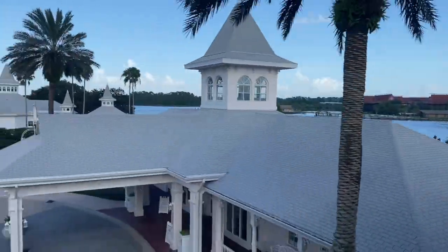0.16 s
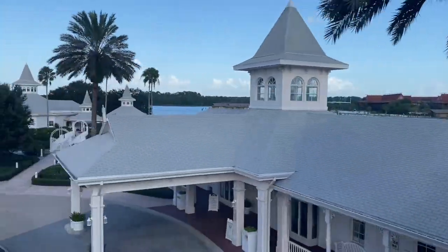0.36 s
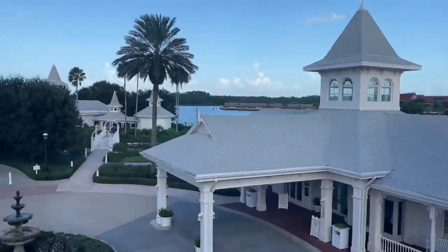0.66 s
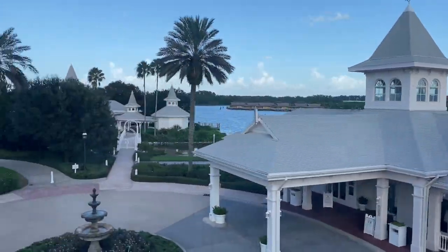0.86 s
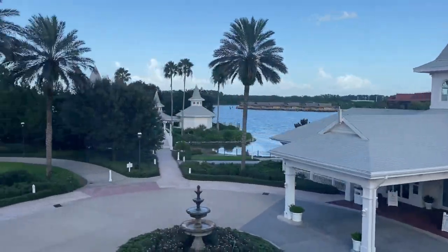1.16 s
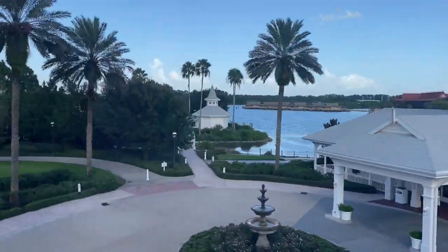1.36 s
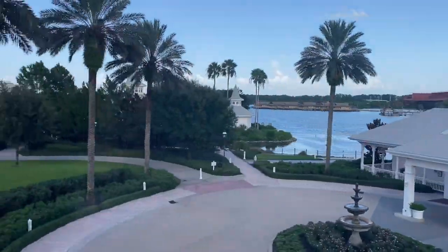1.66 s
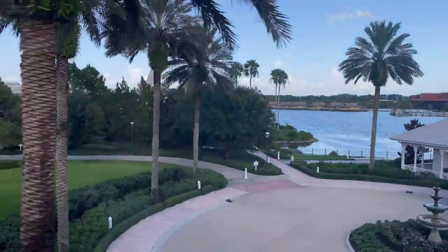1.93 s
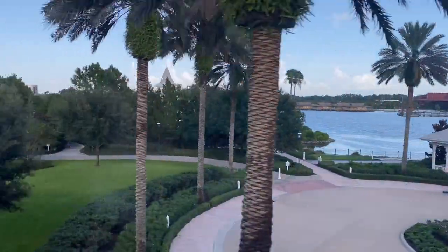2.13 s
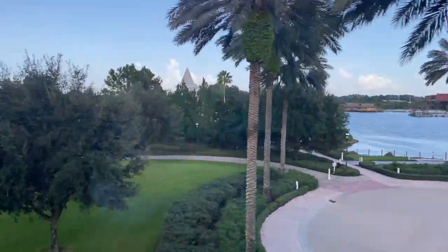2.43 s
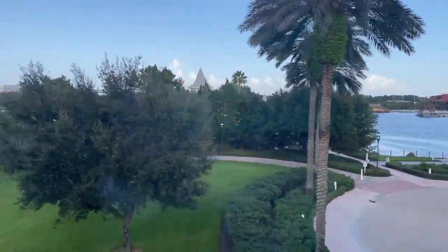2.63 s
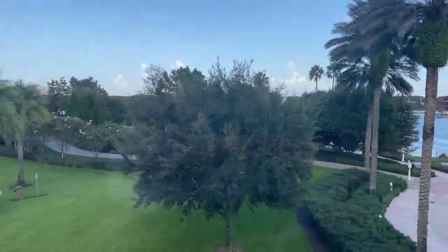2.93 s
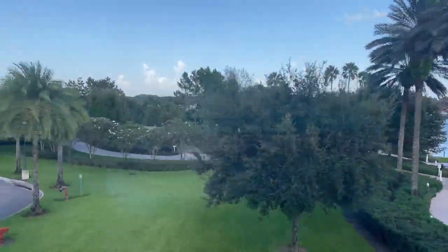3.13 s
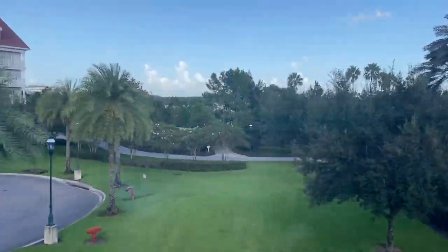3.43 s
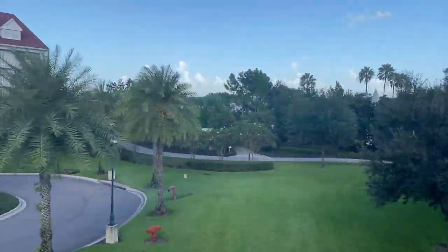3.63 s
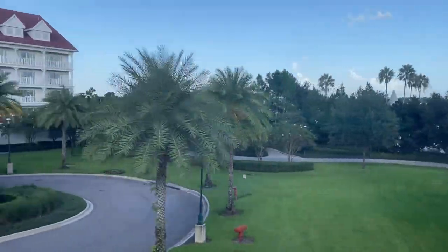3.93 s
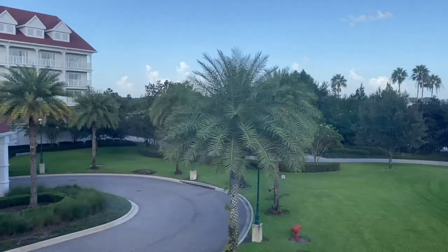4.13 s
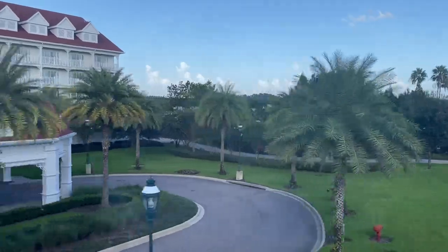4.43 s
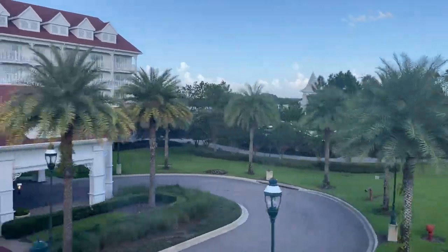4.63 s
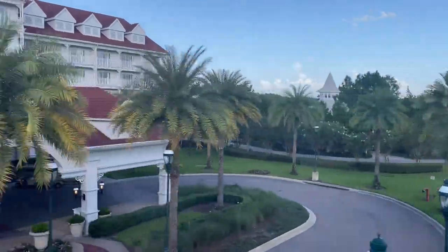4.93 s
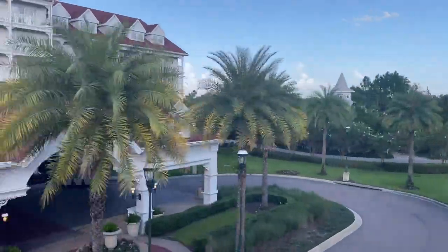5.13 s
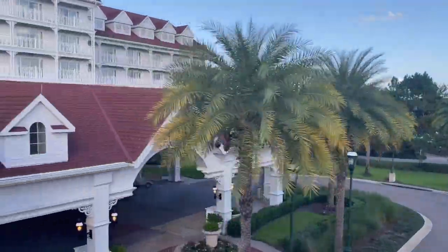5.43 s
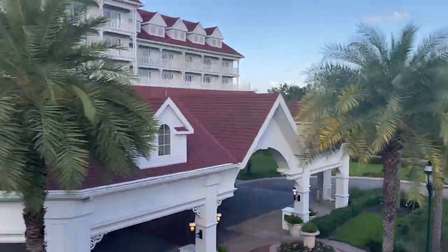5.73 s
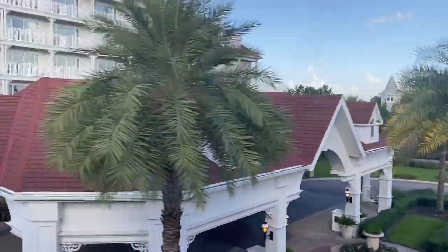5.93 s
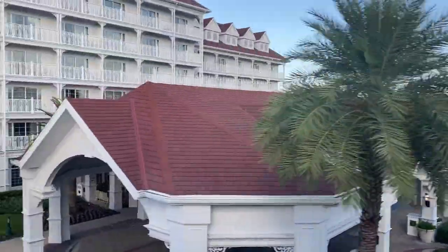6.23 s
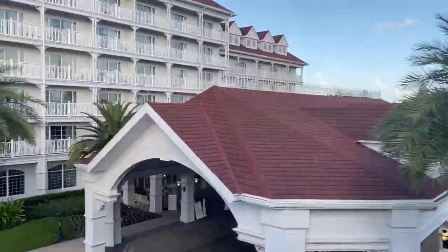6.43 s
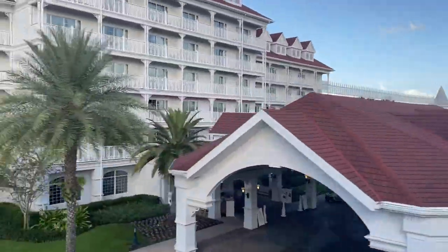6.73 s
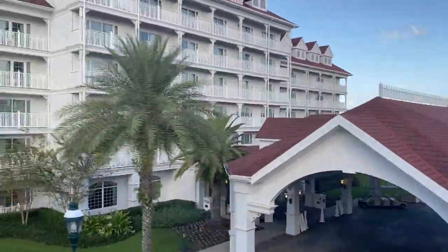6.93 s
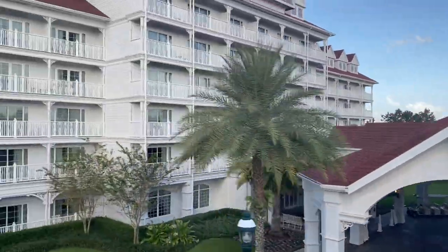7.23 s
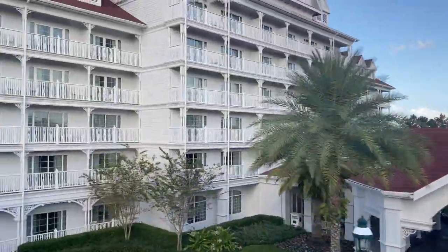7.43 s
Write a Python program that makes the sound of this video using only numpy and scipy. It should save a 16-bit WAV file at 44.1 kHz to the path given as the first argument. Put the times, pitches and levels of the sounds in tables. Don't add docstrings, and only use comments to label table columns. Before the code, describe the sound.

Inside a closed rubber-tyred monorail car, a dense, deep rumble booms through the floor for the whole 7.5 seconds, with a low shudder beneath. Short bumps swell it at about 0.3, 0.7 and 1.7 s, then often after 3.5 s. A low motor hum holds steady at first, swelling and receding; thin fan whine flutters overhead between left and right, over soft vent hiss and faint steady electric tones. Small bright ticks of loose fittings cluster at 0.7-1.3 s, with a sharper one near 4.2 s. From 3 s the hum slides gradually down as the car brakes gently, and rough gear tones come forward. Dull, short tyre knocks land between 3.8 and 4.5 s, again around 5.4 and 5.6 s, and softly at 7.45 s. The hum is fullest around 6 s; the rumble eases slightly afterwards, still rolling at the end. Close hand-held phone stereo, bass centred.

```python
import sys
import numpy as np
from scipy import signal
from scipy.fft import rfft, irfft, next_fast_len
from scipy.io import wavfile
from scipy.ndimage import uniform_filter1d

SR = 44100
rng = np.random.default_rng(int(sys.argv[2]) if len(sys.argv) > 2 else 0)


def volts_from_decibels(level):
    exponent = np.asarray(level, float) / 20
    return 10 ** exponent


def waveform_to_disk(signal):
    frames = np.transpose(np.atleast_2d(signal))
    scaled = np.clip(frames, -1, 1) * 32767
    samples = np.round(scaled).astype(np.int16)
    wavfile.write(sys.argv[1], SR, samples)


N = 333792

# f/Hz, density level/dB per Hz
CABIN_COLOUR = [(18, -74), (42, -43.5), (68, -28.5), (105, -36.5), (170, -44), (250, -43), (450, -52),
                (950, -62.5), (1750, -66), (2200, -72.5), (4000, -81), (5900, -82), (7500, -97.5),
                (15000, -108.5)]
# f/Hz, width/Hz, level/dB
RESONANCES = [(60, 10, 1.5), (82.6, 18, 3), (96.5, 5.8, 7), (121.3, 29, 5.5), (152, 15, 0),
              (1124, 240, -1.5), (1295, 39, 5), (1434, 43, 2.5), (1680, 50, 0), (2450, 144, 4),
              (5300, 180, -2), (11100, 400, 0.5), (12100, 1300, -5), (12850, 300, 2), (14800, 1200, -0.5),
              (15550, 500, -13), (1970, 600, 1.5), (870, 80, 1.5)]
# f/Hz, left minus right level/dB, likeness/0-1
PORTS = [(60, -0.5, 1), (240, 2, 0.95), (433, -3.5, 0.82), (637, 2.5, 0), (970, 0.5, 0.15), (1440, 2.5, 0),
         (1740, 4.5, 0.4), (2100, 1, 0.34), (2340, 1, 0), (4380, 3.5, 0.15), (5600, 6.5, 0.28),
         (6950, 4, 0), (8700, -2, 1), (10000, 0, 1)]
# f/Hz, lead/half turns
PORT_LEAD = [(400, 0), (720, -.6), (1200, -.5), (1750, -1), (2450, -.2), (6600, 0), (8300, 1), (10050, 2),
             (12000, 3), (14150, 4), (15900, 5)]
# t/s, floor rumble level between bumps/dB
BEAM_ROUGHNESS = [(0, -17), (1.5, -16.5), (3.3, -17.5), (3.9, -15.5), (4.5, -17), (5.3, -17.5), (6.0, -17),
                  (6.75, -19), (7.3, -20), (7.57, -20)]
# start t/s, length/s, level/dB
BUMPS = [(0.279, 0.034, -11), (0.573, 0.034, -17), (0.696, 0.034, -10.5), (1.672, 0.095, -15.5),
         (2.045, 0.04, -15), (2.175, 0.076, -25), (2.317, 0.044, -19), (2.774, 0.086, -17),
         (3.522, 0.088, -16), (3.76, 0.12, -16), (3.965, 0.27, -14), (4.428, 0.068, -16),
         (4.533, 0.059, -18), (4.787, 0.13, -14.5), (5.043, 0.18, -18), (5.348, 0.027, -15),
         (5.657, 0.047, -11.5), (6.19, 0.086, -13), (6.448, 0.062, -9.5), (6.993, 0.082, -13),
         (7.433, 0.11, -13.5)]
# t/s, peak level/dB, ring f/Hz
KNOCKS = [
    (3.818, -7.5, 358),
    (4.058, -6, 262),
    (4.267, -8, 194),
    (4.446, -11, 383),
    (4.51, -11, 216),
    (5.448, -6, 223),
    (5.645, -10, 350),
    (7.455, -14, 372),
]
# start t/s, length/s, level/dB
HUM_SWELLS = [(0.0, 0.19, -26), (.58, 0.38, -23), (1.08, 0.45, -26), (1.5, 0.52, -26.5), (2.5, 0.13, -28),
              (3.15, 0.65, -29.5), (3.92, 0.13, -25), (4.45, 0.8, -22), (5.42, 0.41, -21),
              (5.75, .72, -16.5), (6.5, .28, -22), (7.2, 0.32, -27.5)]
GEAR_RATIOS = (1.215, 1.717, 2, 4.68)
# start t/s, length/s, level/dB
GEAR_SWELLS = [
    [(.95, .35, -28), (1.85, .88, -26.5), (3.1, .63, -26)],
    [(3.85, .65, -28), (4.6, .9, -24.5), (5.55, .15, -30), (6.8, .2, -30)],
    [(3.65, .35, -34), (4.55, .45, -33), (6.2, .5, -30.5), (6.9, .7, -26)],
    [(3.9, .4, -45), (4.45, .25, -46), (4.85, .5, -47)],
]
# f as a multiple of the motor hum, width/Hz, level/dB
TREAD_BANDS = [(7.3, 264, -42.5), (2.2, 58, -41.5)]
# start t/s, length/s, level/dB, left minus right level/dB
WHINE_SWELLS = [(0.148, 0.11, -35.5, -2.5), (0.375, 0.096, -37.5, -2.5), (0.592, 0.066, -34, -12),
                (0.802, 0.086, -43, 1.0), (0.962, 0.35, -32, -4), (1.4, 0.27, -38, 8),
                (1.842, 0.032, -34, 2.0), (1.95, 0.65, -37, 7.5), (2.614, 0.69, -36.5, 6),
                (3.36, 0.32, -39.5, 0.5), (3.764, 0.42, -33.5, -2), (4.344, 0.1, -34.5, -4),
                (4.646, 0.376, -33, -2), (5.236, 0.14, -36, 1), (5.43, 0.73, -36, -4), (6.17, 0.12, -37, 2),
                (6.4, 0.32, -34.5, -0.5), (6.829, 0.083, -36, -3.0), (7, 0.64, -38.5, -8)]
# t/s, f/Hz
WHINE_PITCH = [(0, 809), (1.3, 806), (1.5, 799), (3.45, 799), (3.7, 807), (5.6, 808), (6, 810), (7.57, 810)]
# f/Hz, left level/dB, right level/dB
INVERTER_TONES = [(1679, -52, -58), (1798, -48, -53), (4316, -68, -70), (4436, -67, -69),
                  (4795.5, -67, -69), (4949, -68, -70), (10363, -80, -80)]
# t/s, peak level/dB, share below 8 kHz/dB
TICKS = [(0.6898, -46.5, -3), (0.7021, -35, -8), (1.0869, -58.5, -2), (1.1009, -36, -16),
         (1.1761, -38, -15), (1.26, -53, -4), (1.2725, -38, -14), (1.3009, -43, -15), (1.3224, -42, -9),
         (1.6043, -43, -2), (2.8075, -52, -4), (3.2241, -49, -4), (3.3857, -56, -4), (3.5392, -51, -6),
         (3.7212, -50.5, -8), (4.1676, -31.5, -2), (4.2895, -42, -8), (4.4109, -49.5, -10),
         (4.51, -44, -12), (5.4166, -47, -7.5), (5.7463, -52, 0), (7.33, -47, -8)]

OPPOSITE = np.array([[1], [-1]])


def columns(table):
    times, *values = np.transpose(table)
    return [np.interp(np.arange(N) / SR, times, column) for column in values]


def unit(x):
    return x / np.sqrt(np.mean(x ** 2))


def walk(rate_hz):
    hold = int(SR / rate_hz)
    steps = np.repeat(rng.standard_normal(N // hold + 1), hold)
    return 1.3 * uniform_filter1d(uniform_filter1d(steps, hold), hold)[:N]


def tone(hz, wobble_hz=0.):
    phase = 2 * np.pi * np.cumsum(hz + wobble_hz * walk(12)) / SR
    return np.sqrt(2) * np.sin(phase + 2 * np.pi * rng.random())


def swells(rows, rest_db, edge_s):
    t, power = np.arange(N) / SR, volts_from_decibels(2 * rest_db)
    for start, length, db in rows:
        shape = np.clip(np.minimum(t - start, start + length - t) / edge_s + .5, 0, 1)
        power = power + volts_from_decibels(2 * db) * shape ** 2
    return 10 * np.log10(power)


def motor_hz():
    cruise_hz, brake_s, fall_hz_per_s, ease_s = 240.3, 3.0, 11.3, .9
    late = (np.arange(N) / SR - brake_s) / ease_s
    return cruise_hz - fall_hz_per_s * ease_s * np.logaddexp(0, 4 * late) / 4


def cabin():
    size = next_fast_len(N)
    hz = np.maximum(np.arange(size // 2 + 1) * SR / size, 1)
    spectra = port_noise(hz)
    parts, levels = np.zeros((4, 2, N)), ride()
    for centre_hz in 16 * 2 ** np.arange(0, 10.6, .5):
        share = np.cos(np.pi * np.clip(np.log2(hz / centre_hz), -.5, .5)) ** 2
        part = np.searchsorted([140, 600, 7500], centre_hz)
        flicker_db = (2.6, 1.0, 0.81, 1.0)[part]
        band = irfft(spectra * share, size)[:, :N]
        parts[part] += band * volts_from_decibels(flicker_db * walk(9))
    swell = np.sqrt(uniform_filter1d(parts[0].mean(axis=0) ** 2, int(.08 * SR)))
    parts[0] /= swell ** 0.77
    trim_db = (0.11, 0.053, 3.76, 4.57)
    return sum(unit(part) * volts_from_decibels(db + trim) for part, db, trim in zip(parts, levels, trim_db))


def ride():
    edge_s, bump_trim_db = 0.02, -1.5
    bumps = [(s, length, db + bump_trim_db) for s, length, db in BUMPS]
    floor_db = swells(bumps, columns(BEAM_ROUGHNESS)[0], edge_s)
    surge_s, surge_db = 0.093, -3.5 - 15
    surges = [(s - surge_s / 2, surge_s, db + surge_db) for s, db, _ in KNOCKS]
    drone_rest_db = -20 + 0.34 * (floor_db - floor_db.mean())
    drone_db = swells(surges, drone_rest_db, edge_s)
    vent_db, hiss_db = -32.5, -56
    return floor_db, drone_db, vent_db, hiss_db


def port_noise(hz):
    def read(table, column):
        rows = np.array(table)
        return np.interp(np.log(hz), np.log(rows[:, 0]), rows[:, column])
    left, other = rng.standard_normal((2, len(hz))) + 1j * rng.standard_normal((2, len(hz)))
    alike = np.clip(read(PORTS, 2), 0, 1)
    lead = np.pi * np.interp(hz, *np.transpose(PORT_LEAD))
    right = alike * np.exp(1j * lead) * left + np.sqrt(1 - alike ** 2) * other
    rings_db = sum(db / (1 + (2 * (hz - at_hz) / width) ** 2) for at_hz, width, db in RESONANCES)
    return volts_from_decibels(read(CABIN_COLOUR, 1) + rings_db) * np.array([left, right * volts_from_decibels(-read(PORTS, 1))])


def knocks():
    t, out = np.arange(int(.1 * SR)) / SR, np.zeros(N + SR)
    for s, db, hz in KNOCKS:
        ring = np.sin(2 * np.pi * hz * t) * np.exp(-t / 0.009) * (1 - np.exp(-t / 0.0022))
        start = int(s * SR)
        out[start:start + len(t)] += volts_from_decibels(db + 4.0) * ring
    return out[:N]


def drive():
    hz = motor_hz()
    hum = tone(hz, 0.54)
    hum_db = swells(HUM_SWELLS, -35.5, 0.1)
    airborne = volts_from_decibels(hum_db + 1.6 * walk(20)) * hum
    grip_s, grip_ease_s = 3.75, .5
    grip = np.clip((np.arange(N) / SR - grip_s) / grip_ease_s + .5, 0, 1)
    cruise_db, brake_db = -50, -33.5
    shake_db = cruise_db + (brake_db - cruise_db) * grip + 1.9 * walk(3.99)
    quadrature = np.gradient(hum) * SR / (2 * np.pi * hz)
    shaking = volts_from_decibels(shake_db) * quadrature * OPPOSITE
    gears = np.zeros(N)
    for ratio, rows in zip(GEAR_RATIOS, GEAR_SWELLS):
        gear_db = swells(rows, -54.5, 0.23)
        gears += volts_from_decibels(gear_db + 2.6 * walk(30)) * tone(ratio * hz, .8 * ratio)
    return airborne + shaking + gears * volts_from_decibels(.6 * OPPOSITE)


def tread():
    hz = motor_hz()
    out = np.zeros((2, N))
    for ratio, width_hz, db in TREAD_BANDS:
        low = signal.butter(2, width_hz / 2, fs=SR, output="sos")
        noise = rng.standard_normal((2, N)) + 1j * rng.standard_normal((2, N))
        slow = signal.sosfilt(low, noise)
        apart = min(ratio / 8, 1)
        pair = slow[0] + apart * slow[1] * OPPOSITE
        carrier = np.exp(2j * np.pi * ratio * np.cumsum(hz) / SR)
        out += volts_from_decibels(db) * unit(np.real(pair * carrier))
    return out


def fans():
    blade_hz, = columns(WHINE_PITCH)
    blade = tone(blade_hz, 3.5)
    later = np.roll(blade, 9)
    ports_db = []
    for side in (.5, -.5):
        rows = [(s, length, db + side * 1.05 * pan_db) for s, length, db, pan_db in WHINE_SWELLS]
        ports_db.append(swells(rows, -49.5, 0.023))
    waver_db = 2 * walk(12) + 3.0 * np.array([walk(18), walk(18)])
    out = volts_from_decibels(np.array(ports_db) + waver_db + 0.2) * np.array([blade, later])
    for hz, *levels_db in INVERTER_TONES:
        gains = np.array([volts_from_decibels(db + 2.4 * walk(2.75)) for db in levels_db])
        out += gains * tone(np.full(N, hz))
    return out


def ticks():
    t = np.arange(int(.12 * SR)) / SR
    crack = np.exp(-t / 0.0037) + volts_from_decibels(-8) * np.exp(-t / .015)
    bounce = volts_from_decibels(-6) * np.exp(-((t - .019) / 0.0035) ** 2)
    rattle = np.exp(-t / 0.004) + volts_from_decibels(-9) * np.exp(-t / 0.06) + bounce
    high, low = np.zeros(N + len(t)), np.zeros(N + len(t))
    for (s, db, low_db), grain in zip(TICKS, rng.standard_normal((len(TICKS), len(t)))):
        grain = grain / np.max(np.abs(crack * grain)) * 2
        at = slice(int(s * SR), int(s * SR) + len(t))
        high[at] += volts_from_decibels(db) * crack * grain
        low[at] += volts_from_decibels(db + low_db) * rattle * grain
    bright = signal.butter(1, [6000, 12500], "band", fs=SR, output="sos")
    dull = signal.butter(2, [3900, 6200], "band", fs=SR, output="sos")
    high, low = signal.sosfilt(bright, high[:N]), signal.sosfilt(dull, low[:N])
    lead = np.pi * np.interp(np.arange(N // 2 + 1) * SR / N, *np.transpose(PORT_LEAD))
    early = irfft(rfft(high) * np.exp(1j * lead), N)
    return volts_from_decibels(6.5) * np.array([high + volts_from_decibels(9) * low, 1.04 * early + volts_from_decibels(-2.0) * low])


def rustle():
    t = np.arange(N) / SR
    swell = volts_from_decibels(-48) * np.exp(-((t - 1.62) / .035) ** 2)
    band = signal.butter(2, [12800, 15200], "band", fs=SR, output="sos")
    return swell * signal.sosfilt(band, rng.standard_normal(N))


def sway():
    band = signal.butter(2, [29, 40], "band", fs=SR, output="sos")
    air, shake = signal.sosfilt(band, rng.standard_normal((2, N)))
    return volts_from_decibels(-31) * unit(air) + volts_from_decibels(-42) * unit(shake) * OPPOSITE


def scene():
    return cabin() + knocks() + drive() + tread() + fans() + ticks() + rustle() + sway()


def top_cut(x):
    return signal.sosfilt(signal.butter(12, 15780, fs=SR, output="sos"), x)


def record(dry):
    fade = np.clip(np.arange(N, 0, -1) / (.008 * SR), 0, 1)
    mix = np.tanh(0.44 * dry * fade) / 0.46
    return top_cut(mix)


dry = scene()
out = record(dry)
waveform_to_disk(out)
```